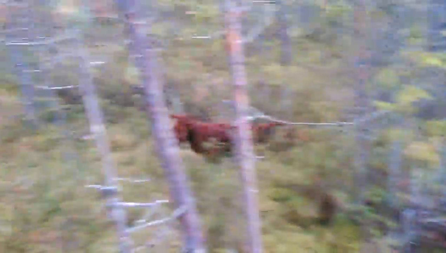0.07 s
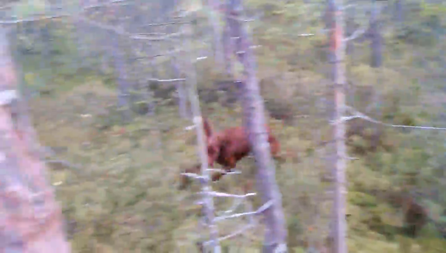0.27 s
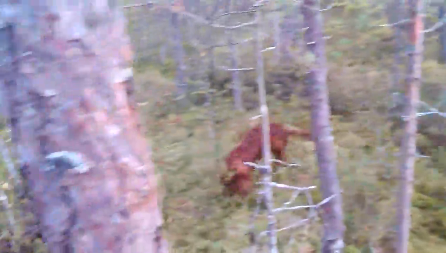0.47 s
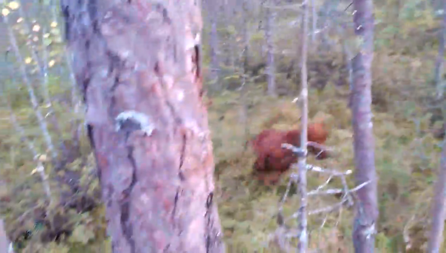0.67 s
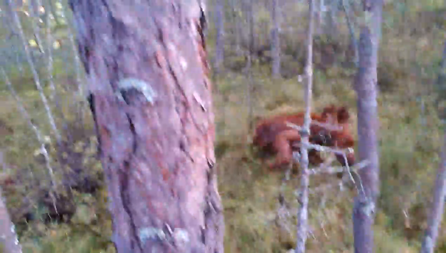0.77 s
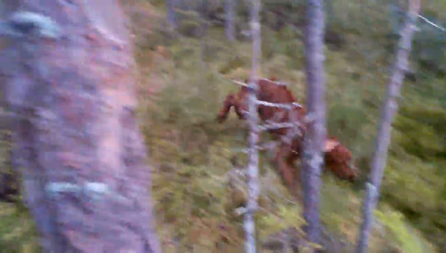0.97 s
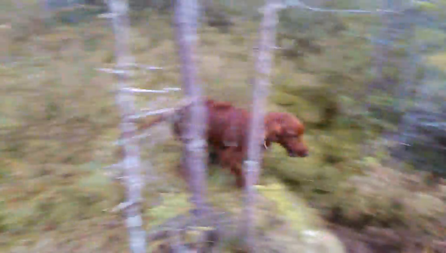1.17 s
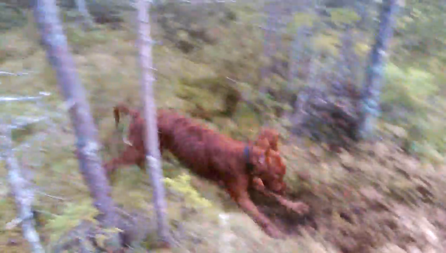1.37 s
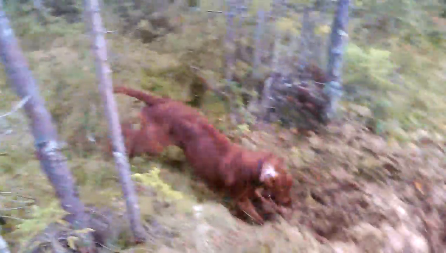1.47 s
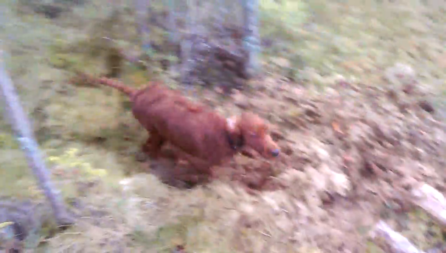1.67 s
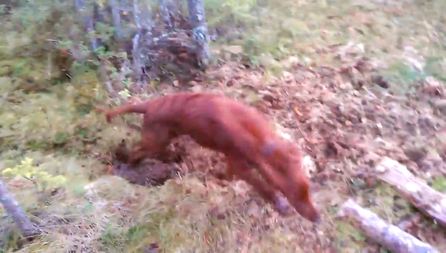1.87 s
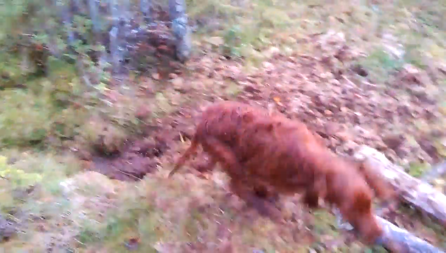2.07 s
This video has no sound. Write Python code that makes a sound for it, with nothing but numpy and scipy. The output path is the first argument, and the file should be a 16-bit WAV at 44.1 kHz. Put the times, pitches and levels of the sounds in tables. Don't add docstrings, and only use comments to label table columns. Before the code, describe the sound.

A dog trots through dry forest undergrowth, paws swishing and crackling, twigs snapping sharply as it nears

```python
import sys
import numpy as np
from scipy import signal
from scipy.fft import rfft, irfft, next_fast_len
from scipy.io import wavfile
from scipy.ndimage import uniform_filter1d

SR = 44100
rng = np.random.default_rng(int(sys.argv[2]) if len(sys.argv) > 2 else 0)


def ratio_of_db(decibels):
    return 10 ** (np.asarray(decibels, float) / 20)


def master_out(mix):
    frames = np.transpose(np.atleast_2d(mix))
    ceiling = np.clip(frames, -1, 1)
    pcm = np.round(ceiling * 32767).astype(np.int16)
    wavfile.write(sys.argv[1], SR, pcm)


N = 93183
FFT = next_fast_len(N)
TIME = np.arange(N) / SR


def curve(points, hz):
    p = np.array(points, float)
    return np.interp(np.log(np.maximum(hz, 1)), np.log(p[:, 0]), p[:, 1])


def colour(x, points):
    gain = ratio_of_db(curve(points, np.fft.rfftfreq(FFT, 1 / SR)))
    y = irfft(rfft(x, FFT) * gain, FFT)[:N]
    return y / np.sqrt(np.mean(y ** 2))


def walk(rate):
    k = max(int(SR / rate), 2)
    held = np.repeat(rng.standard_normal(N // k + 1), k)
    return 1.3 * uniform_filter1d(uniform_filter1d(held, k), k)[:N]


def bands(x, gains):
    hz = np.maximum(np.fft.rfftfreq(FFT, 1 / SR), 1)
    spectrum, out = rfft(x, FFT), 0
    for centre in 40 * 2 ** np.arange(0, 9.5, .5):
        overlap = np.clip(1 - 2 * np.abs(np.log2(hz / centre)), 0, 1)
        out = out + irfft(spectrum * overlap, FFT)[:N] * gains(centre)
    return out


def strike(out, s, db, hz, t60, rise_s):
    i = int(s * SR)
    t = np.arange(min(int(t60 * 1.5 * SR) + 8, N - i)) / SR
    onset = 1 - np.exp(-(t / rise_s) ** 2)
    decay = np.exp(-np.log(1000) * t / t60)
    out[i:i + len(t)] += ratio_of_db(db) * onset * decay * np.sin(2 * np.pi * hz * t)


def crackle():
    grains_per_s, spread_db = 12000, 1.8
    hit = rng.random(N) < grains_per_s / SR
    size = np.minimum(rng.exponential(size=N), 3.5)
    return hit * ratio_of_db(spread_db * size) * rng.standard_normal(N)


# peak in seconds, level in dB,
# rise in seconds, fall in seconds, litter share in dB.
PAW_SWEEPS = [(.005, -54, 0.021, 0.072, -8.5), (0.0358, -47, 0.0015, 0.0024, -9),
              (.031, -56, 0.0045, 0.0017, -22), (.087, -57, 0.0025, 0.013, -33),
              (0.09, -54.5, 0.034, 0.11, -12), (.24, -79, .015, 0.017, 2), (0.327, -49, 0.029, 0.11, -20),
              (0.48, -52.5, 0.017, 0.0065, -41), (0.571, -55.5, 0.026, 0.03, -27),
              (0.619, -54, 0.0037, 0.023, -28.5), (0.666, -52.5, 0.0065, 0.021, -27),
              (0.956, -50, 0.03, 0.04, -10), (1.055, -50, 0.024, 0.042, -18.5),
              (1.159, -48.5, 0.02, 0.047, -15), (1.213, -60.5, 0.011, 0.0063, 3.5),
              (1.274, -52.5, 0.022, 0.013, -28), (.775, -55, 0.0071, 0.017, -22),
              (0.877, -56, 0.0037, 0.014, -30),
              (1.417, -56.5, 0.0093, 0.029, -1), (1.435, -50.5, 0.011, 0.0053, -4.5),
               (1.4447, -39.5, 0.0071, 0.0033, -4.5), (1.45, -35.5, 0.0024, 0.005, -4.5),
               (1.465, -46.5, 0.021, 0.011, 1.5), (1.522, -67.5, 0.075, 0.092, 5.5),
               (1.628, -51.5, 0.003, 0.013, -17), (1.6679, -31.5, 0.0018, 0.0058, -16),
               (1.673, -33, 0.0024, 0.0028, -3), (1.678, -36, 0.0044, 0.0019, -2),
               (1.689, -45, 0.0063, 0.021, -5.5), (1.753, -59.5, 0.058, 0.033, 2),
               (1.871, -55, 0.01, 0.037, 0.5), (1.907, -51, 0.0096, 0.012, -5.5),
               (1.965, -55.5, 0.025, 0.0059, -2.5), (2.032, -54.5, 0.04, 0.052, -11),
               (2.061, -50.5, 0.012, 0.004, -11.5)]
# frequency in Hz, level in dB per Hz.
HEATHER_SPECTRUM = [(2500, -23), (4000, -13.5), (6000, -7.5), (8000, 1), (10500, -1), (12500, -6.5),
                    (15800, -9.5)]
# frequency in Hz, level in dB per Hz.
LITTER_SPECTRUM = [(120, -6), (400, -5.5), (1150, 0.5), (1600, -4.5), (2200, -3.5), (3500, 1.5),
                   (5500, -1.5), (12000, -24.5)]


def paws():
    tips_power, litter_power = np.zeros(N), np.zeros(N)
    for s, db, rise, fall, litter_db in PAW_SWEEPS:
        before = np.abs((s - TIME) / rise) ** 1.4
        after = (TIME - s) / fall
        power = ratio_of_db(db) ** 2 * np.exp(-2 * np.where(TIME < s, before, after))
        tips_power += power
        litter_power += power * ratio_of_db(litter_db) ** 2
    tips = bands(colour(crackle(), HEATHER_SPECTRUM), lambda hz: ratio_of_db(3.2 * walk(180)))
    litter = bands(colour(crackle(), LITTER_SPECTRUM), lambda hz: ratio_of_db(2.6 * walk(min(hz / 12, 150))))
    return np.sqrt(tips_power) * tips + np.sqrt(litter_power) * litter


# start in seconds, peak in dB, pitch in Hz, T60 in seconds.
TWIG_SNAPS = [(.035, -26, 12650, 0.0018), (.088, -43.5, 644, 0.014), (.09, -47.5, 2170, 0.017),
              (.79, -53, 336, 0.17), (.947, -48.5, 685, 0.05), (.958, -26, 7040, 0.0015),
              (.9625, -40, 6430, 0.0019), (1.206, -39.5, 3910, 0.011), (1.412, -41, 763, 0.052),
              (1.441, -32, 1326, 0.03), (1.446, -42, 2000, 0.058), (1.447, -29, 283, 0.022),
              (1.52, -48.5, 303, 0.078), (1.6664, -28, 12300, 0.0011), (1.669, -32, 9800, 0.0098),
              (1.673, -45, 490, 0.0087), (1.6765, -32, 7150, 0.0067), (1.677, -30.5, 9700, 0.0071),
              (1.678, -42, 4300, .02), (1.668, -33, 16000, .002), (1.672, -35, 2060, 0.0066),
              (1.673, -32.5, 830, 0.019), (1.675, -43, 3650, 0.0034), (1.674, -26, 255, 0.014),
              (1.717, -47, 1054, 0.032), (1.738, -43, 640, 0.031), (1.753, -39.5, 692, 0.03),
              (1.87, -34.5, 2930, 0.0097), (1.872, -41, 1115, 0.032), (1.89, -36, 1710, 0.022),
              (1.891, -35, 994, 0.013), (1.888, -43, 141, 0.048), (1.866, -43.5, 1640, 0.0075),
              (1.882, -44, 2960, 0.021), (1.966, -47.5, 2150, 0.02), (1.964, -41.5, 129, .05),
              (1.443, -54, 8800, 0.0068), (1.447, -27, 11020, 0.0076), (1.446, -31, 7350, 0.0098),
               (1.4485, -33, 4860, 0.023), (1.455, -34.5, 4070, 0.012), (1.458, -48.5, 1160, 0.028),
               (1.46, -38, 4900, 0.0093), (1.465, -46, 2670, 0.0042), (1.468, -44, 3880, 0.0033),
               (1.687, -39, 3330, 0.043), (1.87, -50, 2100, 0.02), (1.871, -40.5, 7710, 0.016),
               (1.877, -46.5, 7080, .05), (1.895, -44, 223, 0.035), (1.905, -39.5, 9700, 0.0094),
               (1.909, -38, 1510, 0.0074), (1.874, -40, 1870, 0.016), (1.884, -46, 1300, 0.018),
               (1.898, -47, 2500, 0.0089), (1.956, -53, 110, 0.062), (1.93, -55.5, 293, .1),
               (1.941, -52, 7000, 0.096), (2.051, -57.5, 277, 0.081), (0.03, -46, 13300, 0.007),
               (.062, -48, 610, 0.022), (0.332, -31, 7670, .003), (1.265, -56.5, 3920, 0.053),
               (1.725, -52, 3530, 0.013), (1.71, -49, 2720, 0.023)]
# pitch in Hz, level in dB before the soft onset and fast decay.
BIG_SNAP = [(9600, 2), (7600, -4)]


def twigs():
    out = np.zeros(N)
    for s, db, hz, t60 in TWIG_SNAPS:
        rise_s = 1.1 / hz
        second_hz = hz * (1.14 + .03 * rng.standard_normal())
        strike(out, s, db, hz, t60, rise_s)
        strike(out, s, db - 8, second_hz, t60 * .7, rise_s)
    for hz, db in BIG_SNAP:
        strike(out, 1.66785, db, hz, t60=.0016, rise_s=.0004)
    return out


# start in seconds, peak in dB, struck edge from 0 to 1.
TAG_CHINKS = [(0.235, -49, 0.16), (0.299, -56, 0.1), (0.761, -55, 1), (0.77, -43, 0.63), (.781, -59, 0.86),
              (0.864, -40.5, 0.49), (0.8729, -33, 0), (0.885, -43, 0.34), (0.9, -41, 0.17),
              (0.915, -50, 0.16), (1.244, -56, 0.15), (1.408, -44.5, 0.2), (1.424, -46.5, 0.6),
              (1.441, -50.5, 1)]
# frequency in Hz, level from edge 0 in dB,
# level from edge 1 in dB, T60 in seconds.
TAG_MODES = [(10190, -3.5, -7.5, 0.11), (9815, -7, -12, 0.067), (15600, -14, -1, 0.13),
             (9120, -19.5, -25, 0.041), (8700, -24, -3.5, 0.07), (7380, -21.5, 2.5, 0.047),
             (9450, -20, 2, 0.06), (13230, -19, 3, 0.05), (8250, -19, -15, 0.05),
             (10600, -10.5, -24, 0.046), (5400, -27.5, -24, 0.062), (11250, -19, -8, .06)]


def tag():
    out = np.zeros(N)
    for s, db, edge in TAG_CHINKS:
        for hz, edge0_db, edge1_db, t60 in TAG_MODES:
            mode_db = edge0_db + edge * (edge1_db - edge0_db)
            wobble = 1 + 0.0024 * rng.standard_normal()
            strike(out, s, db + mode_db, hz * wobble, t60, rise_s=.0008)
    return out * ratio_of_db(1.2 * walk(200))


def trees(dog):
    level_db, t60_s = -13, .1
    t = np.arange(8000) / SR
    tail = rng.standard_normal(len(t)) * np.exp(-np.log(1000) * t / t60_s) * (t > .003)
    return ratio_of_db(level_db) * signal.fftconvolve(dog, tail / np.sqrt(np.sum(tail ** 2)))[:N]


# frequency in Hz, width in Hz, level in dB.
BRANCH_HUMS = [(1451, 71, -71), (2150, 210, -73), (685, 210, -80)]


def branch():
    out = np.zeros(N)
    for hz, width, db in BRANCH_HUMS:
        peak = [(hz - 2 * width, -40), (hz, 0), (hz + 2 * width, -40)]
        out += ratio_of_db(db) * colour(rng.standard_normal(N), peak)
    return out * np.exp(-TIME / 0.36)


# frequency in Hz, level in dB per Hz.
HUSH_SPECTRUM = [(65, -43.5), (140, -11.5), (285, -0.5), (460, -3.5), (660, 0), (2450, -13), (8700, -11),
                 (16000, -11)]


def hush():
    level_db, swell = -60.5, walk(6.2)
    noise = colour(rng.standard_normal(N), HUSH_SPECTRUM)
    return ratio_of_db(level_db) * bands(noise, lambda hz: ratio_of_db(0.66 * swell + 1.06 * walk(14.06)))


# time in seconds, level in dB.
GUST_LEVELS = [(0.0, -74), (0.15, -83.5), (0.25, -74.5), (0.32, -81), (0.82, -71), (0.97, -81.5),
               (1.06, -72.5), (1.1, -75), (1.19, -72), (1.34, -81), (1.46, -62), (1.58, -71), (1.7, -72.5),
               (1.81, -87), (1.9, -61), (1.94, -70), (2.09, -72), (2.11, -78)]
# frequency in Hz, level in dB per Hz.
WIND_SPECTRUM = [(8, 2.5), (25, -5.5), (60, -16.5), (200, -21), (600, -58)]


def wind():
    gusts = np.array(GUST_LEVELS)
    level_db = np.interp(TIME, gusts[:, 0], gusts[:, 1]) + 7 + 2.8 * walk(24)
    return ratio_of_db(level_db) * colour(rng.standard_normal(N), WIND_SPECTRUM)


def scene():
    dog = paws() + twigs() + tag()
    return (dog + trees(dog) + branch() + hush() + wind())[None]


# frequency in Hz, step over band rms in dB.
STEP_SIZES = [(300, -12), (2500, -3), (4500, 5), (6300, 6.5), (7500, 11), (10000, 12), (12000, 8.5),
              (15800, 6)]


def thrift(x):
    hop, band, shift, top_hz = 940, 20, 603, 15900
    quiet_db, follow, jitter_db = -66, .9, 1.8
    starve_db, starve_s, jolt_db, linger_db = 1.5, .13, 14, 2.5
    x = np.pad(x, (hop + shift, 3 * hop))
    count = len(x) // hop - 1
    n, k = np.arange(2 * hop) + .5, np.arange(hop) + .5
    window = np.sin(np.pi / 2 * np.sin(np.pi * n / (2 * hop)) ** 2)
    cosines = np.cos(np.pi / hop * np.outer(n + hop / 2, k)) * np.sqrt(2 / hop)
    basis = window[:, None] * cosines
    where = hop * np.arange(count)[:, None] + np.arange(2 * hop)
    lines, hz = x[where] @ basis, k * SR / (2 * hop)
    band_db = 10 * np.log10(np.mean(lines.reshape(count, -1, band) ** 2, axis=2) + 1e-12)

    slopes = np.diff(x[where], prepend=0).reshape(count, 20, -1)
    slices = 10 * np.log10(np.mean(slopes ** 2, axis=2) + 1e-12)
    jolt = (np.max(slices[:, 2:] - slices[:, :-2], axis=1) > jolt_db) & (slices.max(axis=1) > -29)
    starve = np.convolve(jolt, np.hanning(int(2 * starve_s * SR / hop))[2:])[:count]

    near_db = uniform_filter1d(band_db, size=7, axis=1)
    near_db[1:] = near_db[1:] + np.clip(near_db[:-1] - near_db[1:] - 2, 0, linger_db)
    scatter = uniform_filter1d(2 * rng.standard_normal(band_db.shape), size=3, axis=1)
    step_db = quiet_db + follow * (near_db - quiet_db) + jitter_db * scatter
    step_db += (starve_db * np.minimum(starve, 1) - 20 * jolt)[:, None]
    step = ratio_of_db(np.repeat(step_db, band, axis=1) + curve(STEP_SIZES, hz))
    lines = np.sign(lines) * np.floor(np.abs(lines) / step + .4) * step
    lines = lines * (hz < top_hz + 400 * jolt[:, None])
    out = np.zeros(len(x))
    np.add.at(out, where, lines @ basis.T)
    return out[hop + shift:][:N]


def low_pass(x):
    return signal.sosfilt(signal.butter(12, 16980, fs=SR, output="sos"), x)


def record(dry):
    centre_s, length_s, edge_s = 0.02134, 0.0081, 0.00044
    away = np.abs(TIME - centre_s) - length_s / 2
    gate = np.clip(away / edge_s + .5, .01, 1)
    return low_pass(thrift(dry[0])[None] * gate)


dry = scene()
out = record(dry)
master_out(out)
```